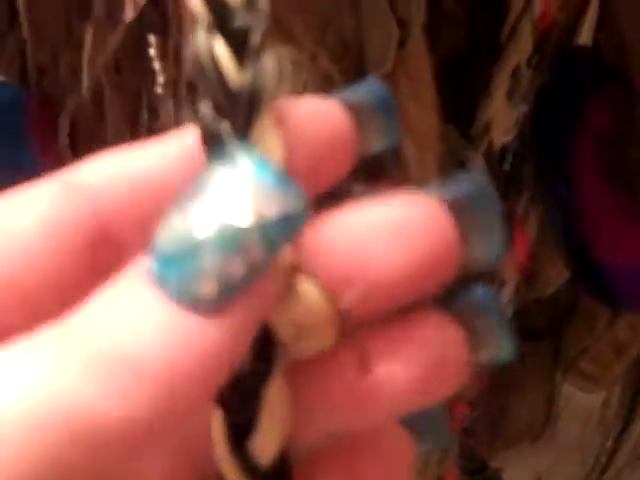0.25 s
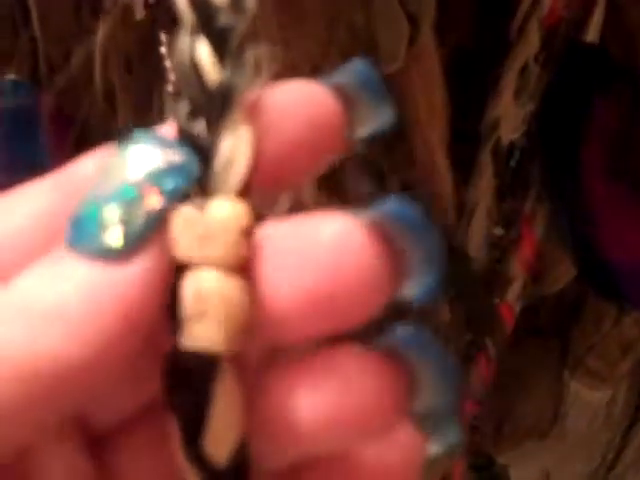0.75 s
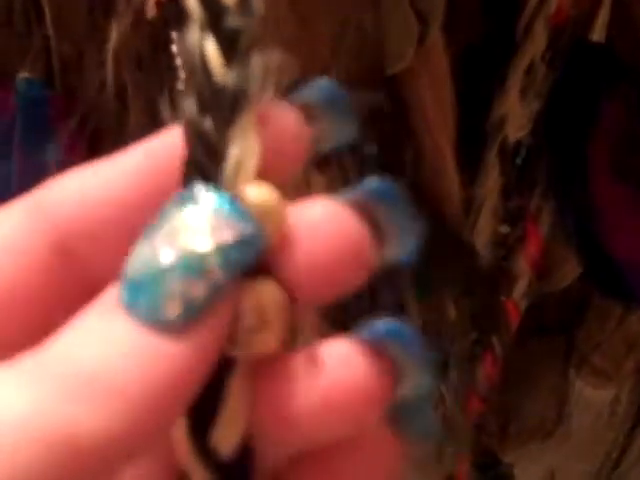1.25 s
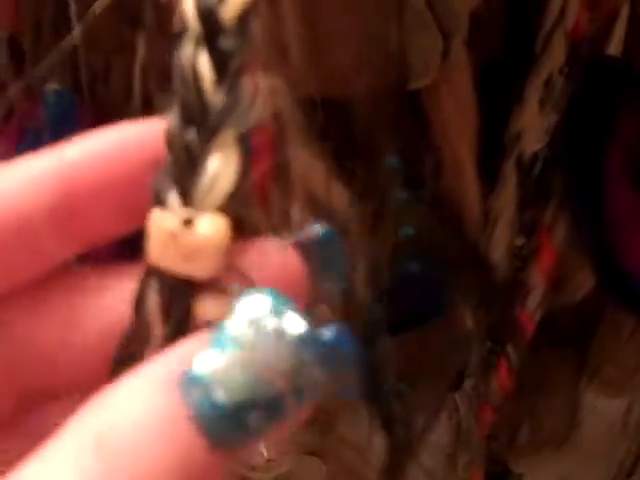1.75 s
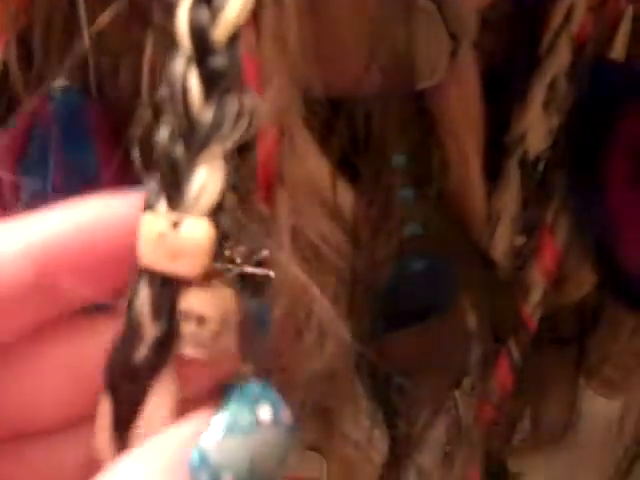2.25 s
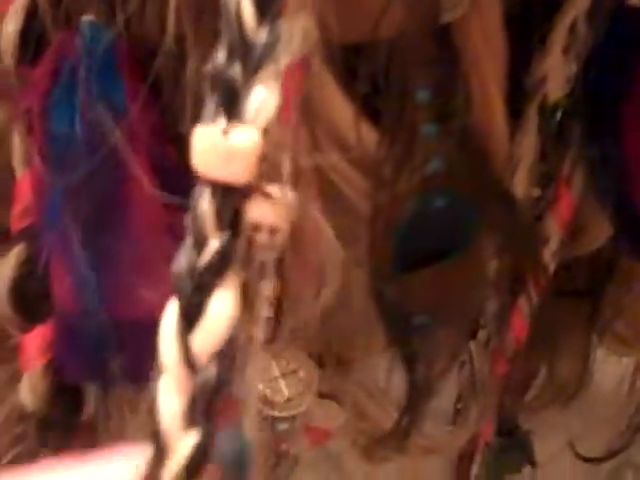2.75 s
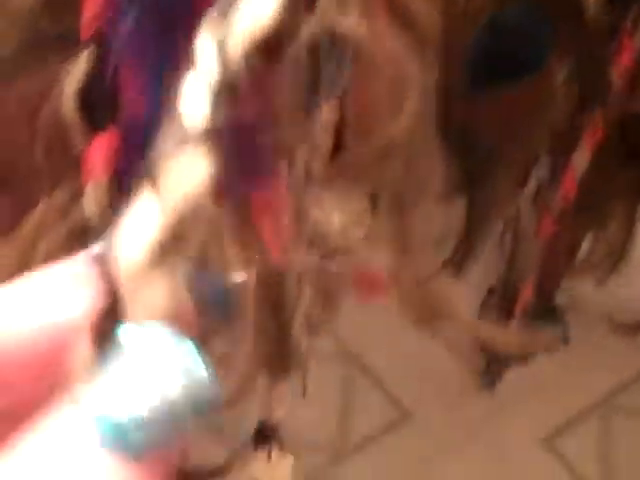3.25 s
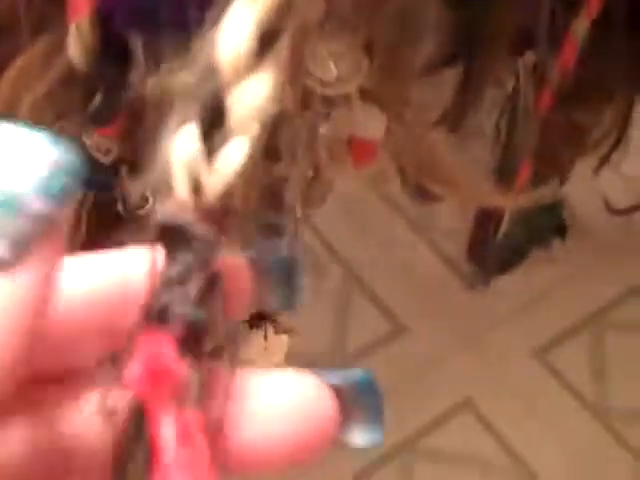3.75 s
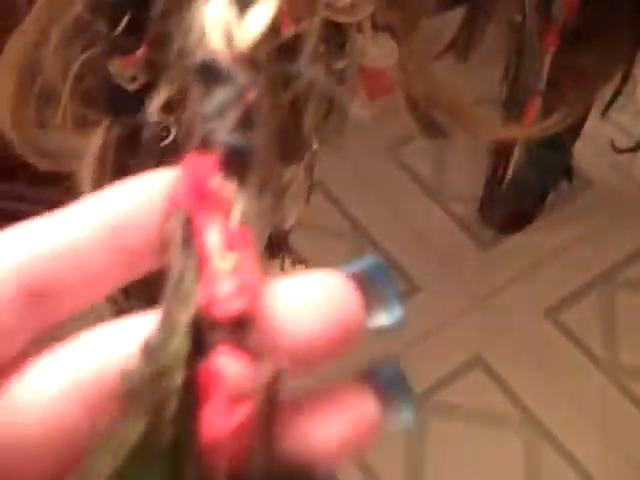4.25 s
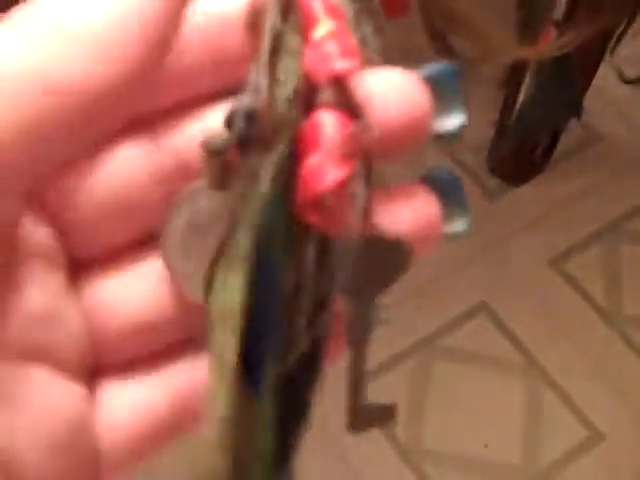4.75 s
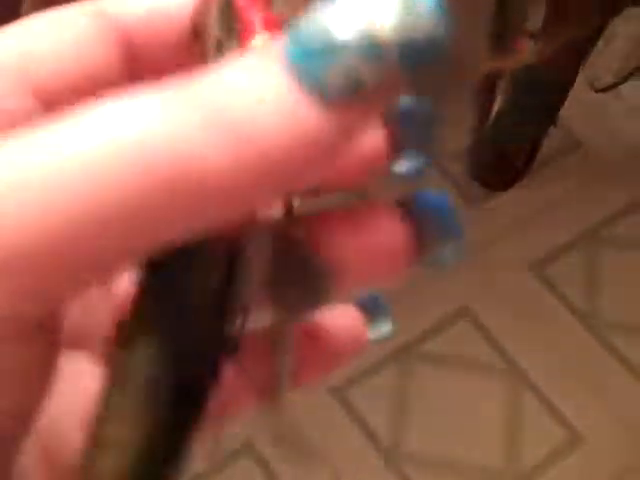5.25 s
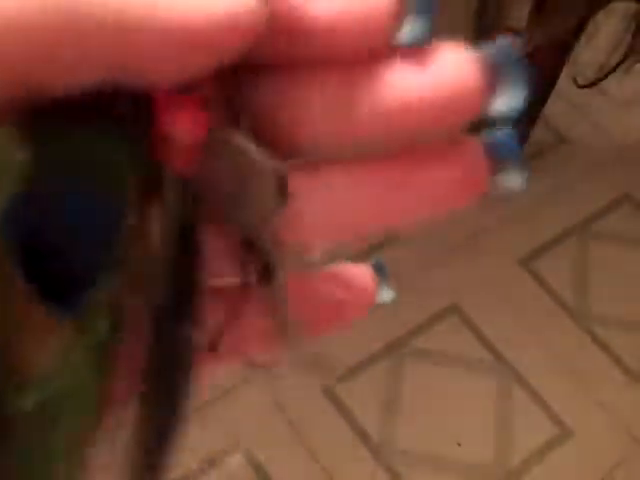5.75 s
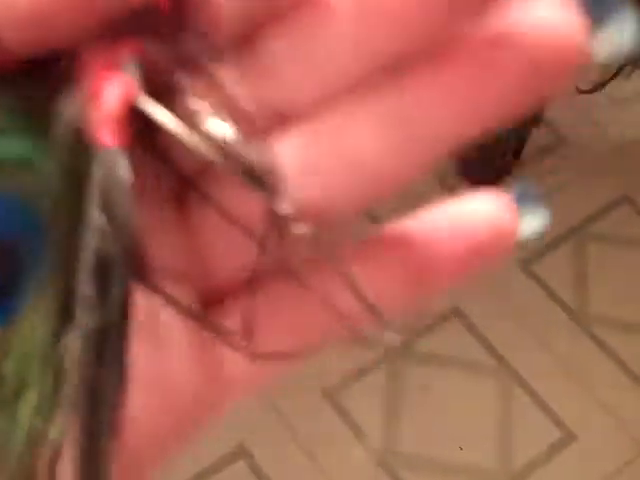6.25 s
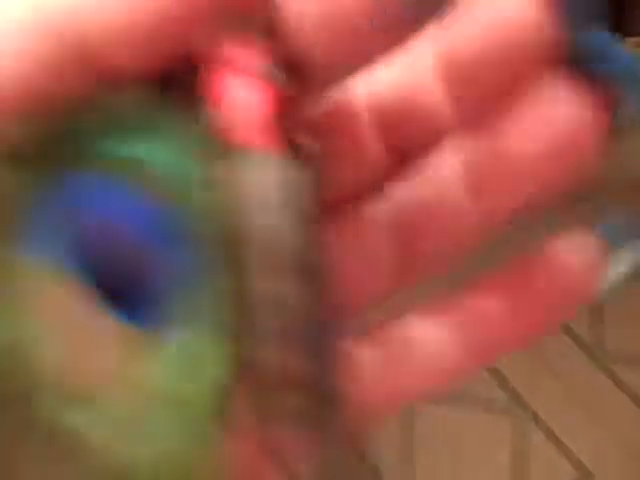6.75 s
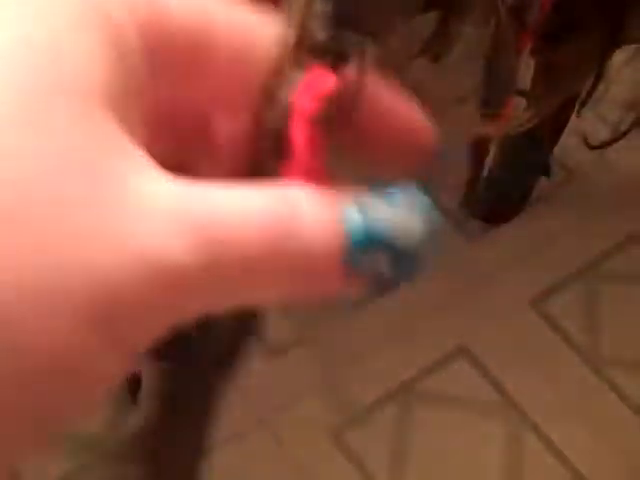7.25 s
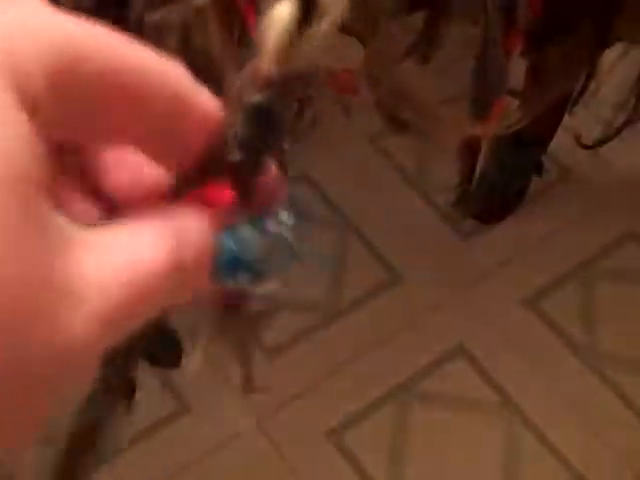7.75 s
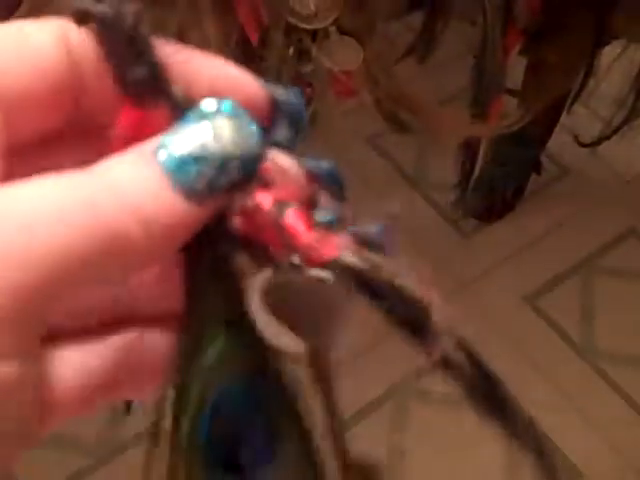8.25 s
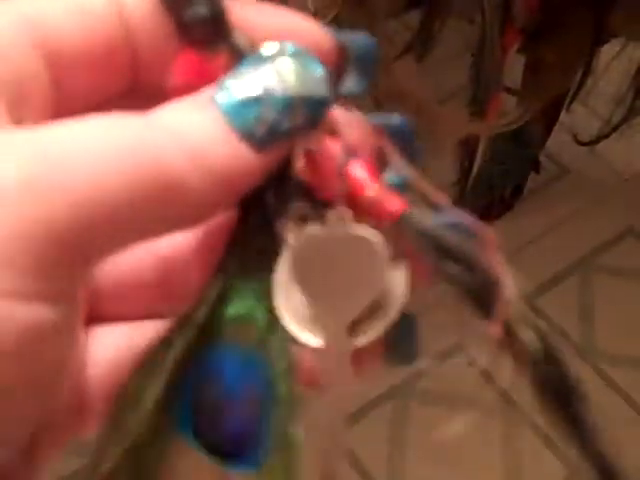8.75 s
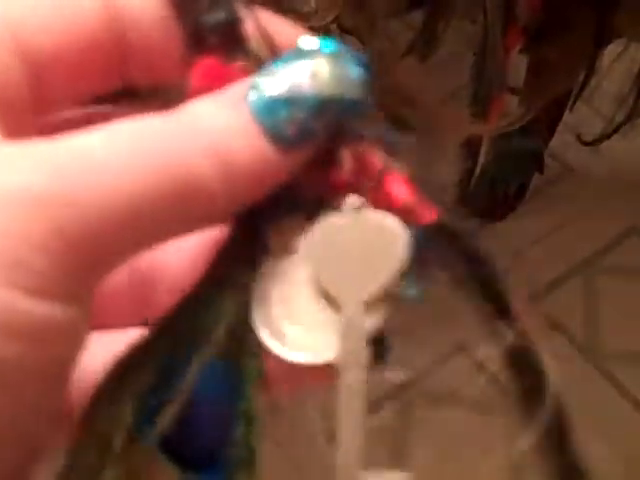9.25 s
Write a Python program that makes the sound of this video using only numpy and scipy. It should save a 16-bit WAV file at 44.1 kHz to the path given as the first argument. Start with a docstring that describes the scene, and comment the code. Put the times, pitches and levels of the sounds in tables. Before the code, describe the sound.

Close handling of beaded hair makes soft rustles, dry clicks and clusters of thin metallic jingling, while a clock ticks faintly in the room.

```python
"""In a quiet room, close to a small camera, a hand sorts through braids hung with beads and charms.
Hair rustles, beads crack dryly, a coin rings when a key hits it, and the two rattle in chains of tiny
contacts as they slide. Further off a clock ticks in its hollow case and something bumps and taps,
over a low hum and a faint whine that fades away."""
import sys
import numpy as np
from scipy import signal
from scipy.fft import rfft, irfft
from scipy.io import wavfile
from scipy.ndimage import uniform_filter1d

SR = 44100
rng = np.random.default_rng(int(sys.argv[2]) if len(sys.argv) > 2 else 0)


def store_pcm(level_fs):
    """Save levels as 16-bit WAV."""
    pcm = np.round(np.clip(level_fs, -1, 1) * 32767).astype(np.int16)
    wavfile.write(sys.argv[1], SR, np.atleast_2d(pcm).T)


N = 418509

# The hand on the braid. Each row: time in seconds, rustle level in dB, pan as left minus right in dB.
HAND_MOVES = [(0, -92, -5), (0.68, -53, -2.5), (1.05, -64, 5), (1.15, -46.5, -5.5), (1.45, -49.5, -3),
              (1.62, -51, -6), (2.2, -58.5, -5), (2.35, -47, -2.5), (3.1, -42.5, -2.5), (3.45, -51.5, -3.5),
              (3.9, -52.5, 3), (4.2, -51.5, -4), (5.1, -68, -4), (5.3, -49, -4.5), (6.1, -54.5, -7),
              (6.45, -46, -2), (6.75, -48.5, -3), (7.05, -50.5, -2.5), (7.5, -43, -2.5), (8.0, -48, -4.5),
              (8.6, -53, 2), (9.1, -49, 2.5), (9.3, -60.5, 2), (9.49, -31.5, 1.5)]
# The key hits the coin. Each row: start in seconds, relative levels of crack, low ring and high ring
# in dB, base ring time (t60) in seconds as the fingers allow.
KEY_STRIKES = [(3.206, -9.5, -20, -14, 0.093), (3.35, -27, -41, -62, 0.058),
               (3.603, -12.5, -37, -17.5, 0.19), (3.6593, -13, -15.5, -19, 0.085),
               (3.683, -14.5, -12, -10, 0.053), (3.6981, -15, -17.5, -24, 0.1),
               (3.715, -24, -22, -17, 0.12), (3.7416, -27, -45, -31, 0.13),
               (3.7548, -23.5, -33, -20.5, 0.08), (3.9142, -20.5, -46, -29, 0.025),
               (4.1263, -26, -44, -23.5, 0.044), (5.2285, -14.5, -50, -36, 0.15),
               (5.239, -27, -36, -25, 0.074), (5.4904, -47, -41, -34, 0.11), (6.47, -2.5, -5.5, -22, 0.023),
               (6.486, -11, -21, -34, 0.05), (6.4907, -4.5, -19, -10, 0.065), (6.53, -20, -34, -27, 0.053),
               (6.551, -16, -51, -25, 0.04), (6.659, -21, -21, -11, 0.058),
               (6.679, -13.5, -12.5, -30, 0.025), (6.715, -32, -32.5, -52, 0.059),
               (6.821, -35, -36, -49, 0.06), (6.8994, -7, -16, -19, 0.09), (6.93, -11, -34, -21, 0.1),
               (6.9354, -9.5, -44, -10, 0.094), (6.954, -25, -36, -18, 0.1),
               (6.9642, -16.5, -40, -21, 0.08), (6.976, -23, -42, -25, 0.1),
               (7.1864, -21.5, -28, -29, 0.074), (7.2554, -14.5, -15, -8.5, 0.12),
               (7.3786, -20, -11.5, -10.5, 0.18), (7.7049, -15, -21, -15.5, 0.13),
               (7.7524, -31, -33.5, -34, 0.095), (8.2761, -12, -39, -11, 0.076),
               (8.394, -10.5, -19, -22, 0.11), (8.402, -6.5, -29, -14.5, 0.059),
               (9.42, -17, -47, -14.5, 0.057)]
# The pitches of the coin's modes in Hz.
COIN_HZ = [4925, 6348, 9453, 11725]
# Their voicing. Each row: relative level in dB, ring time factor, blend from low ring (0) to high (1).
COIN_MODES = [(-23, 1.15, 0.062), (-3, 0.91, 0), (-10.5, 0.35, 1), (6.5, 0.54, 0.94)]
# Key and coin swing loosely together. Each row: start and end in seconds.
LOOSE_SPANS = [(6.44, 7.0), (8.38, 9.1), (9.27, 9.49)]
PINCHED_FROM_S, PINCH_DB = 8.2, -8  # the thumb pinches the charms and damps their lower ring
KEY_SHANK_HZ = 7110


def gain_of(db):
    """Decibels to amplitude."""
    return 10 ** (np.asarray(db) / 20)


def unit_rms(x):
    """Scale to an RMS of 1."""
    return x / np.sqrt(np.mean(x ** 2) + 1e-20)


def curve_at(points, hz):
    """Read a curve of (Hz, value) points along a log frequency axis."""
    point_hz, value = np.transpose(points)
    return np.interp(np.log(hz + 1), np.log(point_hz + 1), value)


def add(mix, start_s, sound):
    """Lay a sound into the mix."""
    part = mix[..., round(start_s * SR):][..., :sound.shape[-1]]
    part += sound[..., :part.shape[-1]]


def colour(x, eq):
    """Minimum-phase EQ through (Hz, dB) points."""
    half = np.log(gain_of(curve_at(eq, np.fft.rfftfreq(4096, 1 / SR))))
    log_gain = signal.hilbert(np.r_[half, half[-2:0:-1]])
    taps = np.fft.ifft(np.exp(np.conj(log_gain))).real[:2048]
    return signal.oaconvolve(x, taps)[:len(x)]


def resonate(x, hz, width_hz, passes=1):
    """Two-pole resonance of gain 1; more passes steepen it."""
    for _ in range(passes):
        x = signal.lfilter(*signal.iirpeak(hz, hz / width_hz, SR), x)
    return x


def ring(hz, t60, phase, size=9000):
    """One struck mode: a dying sine, its phase in turns."""
    t = np.arange(size) / SR
    return np.sqrt(2) * gain_of(-60 * t / t60) * np.sin(2 * np.pi * (hz * t + phase))


def crack(scratch):
    """A hard contact: a spike with a brief scratch behind it."""
    x = scratch * rng.standard_normal(500) * gain_of(-60 * np.arange(500) / SR / 0.011)
    x[0] = 1
    return gain_of(15.5) * x


def pan(db):
    """Stereo gains for a fixed or moving left-minus-right level."""
    return gain_of(np.vstack([db / 2, -db / 2]))


def room_tail(t60):
    """Stereo room reverb: decaying noise whose treble dies sooner."""
    hz, t, spectrum = signal.stft(rng.standard_normal((2, 22050)), SR, nperseg=256)
    band_t60 = t60 / (1 + (hz / 5000) ** 2)[:, None]
    tail = signal.istft(spectrum * gain_of(-60 * t / band_t60), SR, nperseg=256)[1]
    return tail / np.linalg.norm(tail[0])


def room_tone():
    """Steady air, most centred in the low mids, with a wavering motor hum."""
    # The air's colour. Each row: frequency in Hz, relative level in dB.
    air_eq = [(30, -6.5), (134, -8), (242, -3.5), (463, -9), (1370, -19), (2160, -21.5), (4250, -24),
              (6380, -22), (10000, -29.5), (14100, -32), (14500, -68)]
    # Its stereo image. Each row: frequency in Hz, left-right correlation.
    air_correlation = [(40, -0.12), (240, 0.77), (950, 0.56), (3770, -0.051), (15000, -0.015)]
    # Motor orders. Each row: pitch in Hz, level in dB.
    hum_orders = [(233, -62), (350, -72.5), (465, -69)]
    hz = np.fft.rfftfreq(N, 1 / SR)
    left, spread = rfft(rng.standard_normal((2, N)))
    alike = curve_at(air_correlation, hz)
    right = alike * left + np.sqrt(1 - alike ** 2) * spread
    air = irfft(np.array([left, right]) * gain_of(curve_at(air_eq, hz)), N)
    noise = rng.standard_normal(N)
    hum = sum(gain_of(db) * unit_rms(resonate(noise, pitch, 3.3)) for pitch, db in hum_orders)
    return gain_of(-54) * unit_rms(air) * pan(1.0) + hum


def whine(hz=5499, width_hz=5, db=-75, gone_s=7, fade_s=2):
    """A thin tone of narrow noise that fades out."""
    fade = np.clip((gone_s - np.arange(N) / SR) / fade_s, 0, 1)
    return gain_of(db) * fade * unit_rms(resonate(rng.standard_normal((2, N)), hz, width_hz))


def far_bumps():
    """Dull knocks so far off that only their room tail arrives."""
    # Each row: start in seconds, level in dB, reverb time (t60) in seconds.
    knocks = [(2.347, -42.5, 1), (2.595, -53.5, 0.9), (2.8, -57, 0.69)]
    # Their dull colour. Each row: frequency in Hz, relative level in dB.
    knock_eq = [(59, -54), (100, -2), (190, -6.5), (349, -2), (484, -0.5), (904, -7.5), (1960, -11),
                (3500, -40), (4550, -67)]
    out = np.zeros((2, N))
    for start, db, t60 in knocks:
        tail = np.array([colour(side, knock_eq) for side in room_tail(t60)])
        tail = tail + 0.56 * tail[::-1]  # crossfeed narrows the image
        onset_rms = np.sqrt(np.mean(tail[:, :2000] ** 2))
        add(out, start, gain_of(db) * tail / onset_rms)
    return out


def far_taps(first_s=.804, every_s=1.8):
    """Small, evenly spaced knocks with one woody resonance."""
    out = np.zeros((2, N))
    for start in np.arange(first_s, N / SR, every_s):
        add(out, start, gain_of(-11.5) * resonate(room_tail(0.26), 1810, 400, passes=2))
    return out


def clock(first_s=.2729, swing_s=1.11, tock_after_s=.5758, fade_db_per_s=0.22):
    """Tick and tock: snaps in a hollow case, heard mostly through the room."""
    # Case modes. Each row: pitch in Hz, nominal width in Hz, relative dB on the tick and on the tock.
    case_modes = [(1090, 270, -3.5, -3.5), (1715, 230, -1.5, -5.5), (2104, 400, 1.5, 1.5),
                  (2340, 65, 4.5, -2.5), (3710, 460, -2.5, -4.5), (5550, 270, -11.5, -11)]
    out = np.zeros((2, N))
    swings = np.arange(0, N / SR - first_s, swing_s)
    ticks = swings + .00013 * swings ** 2  # the tick slips gradually later
    tocks = swings + tock_after_s
    for beat, (db, times) in enumerate([(-5, ticks), (-3, tocks)]):
        for start in first_s + times:
            snap = room_tail(0.34)
            snap[:, :200] += 0.045 * rng.standard_normal(200) * np.hanning(200)  # direct sound
            body = sum(gain_of(beat_db[beat]) * resonate(snap, hz, 1.57 * width, passes=2)
                       for hz, width, *beat_db in case_modes)
            level = gain_of(db - fade_db_per_s * start)  # fainter as the camera turns away
            add(out, start - .002, level * (body + 0.23 * body[::-1]))
    return out


def hand_motion():
    """The hand's rustle level and pan in dB, sample by sample."""
    times, level_db, pan_db = np.transpose(HAND_MOVES)
    t = np.arange(N) / SR
    return np.interp(t, times, level_db), np.interp(t, times, pan_db)


def hair_rustle(hand_db):
    """Fine friction of hair and yarn: hiss with countless tiny snags."""
    centre, sides = rng.standard_normal(N), rng.standard_normal((2, N))
    snags = gain_of(3.8 * np.minimum(rng.exponential(1, N), 6))
    flutter = gain_of(2.5 * unit_rms(uniform_filter1d(rng.standard_normal(N), 1200)))
    return gain_of(hand_db) * unit_rms((centre + .5 * sides) * snags * flutter)


def charm_chatter(hand_db, from_s=2.95, hits_per_s=60, timbres=6):
    """Tiny chance contacts, as loud as the hand is lively; they set the loose coin shimmering."""
    t = np.arange(N) / SR
    size, chance, timbre = rng.random((3, N))
    strength = gain_of(hand_db + 2 - 1.5 * np.log(size + 0.042))
    hits = strength * (chance < hits_per_s / SR) * (t > from_s)
    clicks = sum(signal.oaconvolve(hits * (np.floor(timbre * timbres) == k), crack(0.33))[:N]
                 for k in range(timbres))
    loose = sum((t > start) & (t < end) for start, end in LOOSE_SPANS)
    pinch_db = PINCH_DB * (t > PINCHED_FROM_S)
    shimmer = np.zeros(N)
    for hz, (mode_db, _, high) in zip(COIN_HZ, COIN_MODES):
        level = gain_of(0.71 * mode_db + 1.7 * high + pinch_db * (1 - high))
        shimmer += level * resonate(loose * clicks, hz, 0.0055 * hz)
    return clicks + gain_of(20.5) * shimmer


def sliding_contacts(start, length_s, hits_per_s=7000):
    """One slide's dense, clumpy stereo contacts, and a pitch in Hz that colours it."""
    polarity, size, chance, wander = rng.random((4, 5000))[:, :round(length_s * SR)]
    hits = np.sign(polarity - .5) * gain_of(-3 * np.log(size + .01)) * (chance < hits_per_s / SR)
    struck = min(abs(start - row[0]) for row in KEY_STRIKES) < .004  # a blow starts it at full strength
    arch = np.sin(np.pi * np.linspace(.5 * struck, 1, len(hits))).clip(0)
    swell = arch ** (1.6 if struck else 0.5)
    clumps = gain_of(2.5 * unit_rms(uniform_filter1d(wander - .5, 120)))
    hits = unit_rms(hits) * swell * clumps * pan(12 * (wander - .5))
    return np.pad(hits, ((0, 0), (0, 2000))), 6000 + 2500 * polarity[0]


def charm_rattles():
    """Key and coin slide over each other; the contacts scrape and shake the damped metal."""
    # Each row: start and length in seconds, level in dB, relative level of the ring in dB.
    slides = [(3.863, 0.027, -40, 0), (3.91, 0.022, -26.5, 5.5), (3.999, 0.016, -41, 0),
              (5.26, 0.039, -37, 9.5), (5.382, 0.087, -38, -1), (5.49, 0.045, -50, 26),
              (5.669, 0.027, -38.5, 1), (5.697, 0.08, -45, -17), (6.473, 0.015, -21.5, -6),
              (6.489, 0.03, -21, -3), (6.567, 0.034, -36.5, -2), (6.617, 0.079, -28, 5),
              (6.796, 0.041, -40, -8), (6.843, 0.049, -31, 2), (6.941, 0.051, -35, 1),
              (8.279, 0.062, -26, 6), (8.403, 0.032, -22, -11), (8.436, 0.0099, -21.5, 6),
              (8.456, 0.054, -33, 3), (8.5656, 0.0062, -31, 9), (8.59, 0.039, -35, 14),
              (8.642, 0.019, -41.5, 11), (8.731, 0.043, -50, 9), (8.885, 0.064, -39, -5),
              (8.916, 0.016, -30.5, 8), (8.979, 0.011, -30.5, -4), (9.275, 0.062, -35, 5),
              (9.418, 0.047, -33.5, 10), (9.455, 0.079, -45, 1)]
    # The loose key drags over the coin. Each row: pitch in Hz, width in Hz, gain in dB.
    scrape_bands = [(4960, 60, 15), (4040, 640, -0.5)]
    thin = signal.butter(4, 5500, "high", fs=SR, output="sos")
    top_cut = signal.butter(8, 12900, fs=SR, output="sos")  # a steep low-pass trims the rattles' treble
    out = np.zeros((2, N))
    for start, length_s, db, ring_db in slides:
        hits, colour_hz = sliding_contacts(start, length_s)
        pinch_db = PINCH_DB * (start > PINCHED_FROM_S)
        metal = gain_of(-9) * resonate(hits, KEY_SHANK_HZ, 360)
        for hz, (mode_db, _, high) in zip(COIN_HZ, COIN_MODES):
            level = gain_of(0.9 * mode_db + 9.5 * high + pinch_db * (1 - high))
            metal += level * resonate(hits, hz, 0.021 * hz)
        scrape = hits + 1.5 * resonate(hits, colour_hz, 700)
        if any(begin < start < end for begin, end in LOOSE_SPANS):
            scrape += sum(gain_of(band_db + pinch_db) * resonate(scrape, hz, width)
                          for hz, width, band_db in scrape_bands)
        else:
            scrape = signal.sosfilt(thin, scrape)  # gripped charms slide thinly
        add(out, start, gain_of(db) * (scrape + gain_of(ring_db) * metal))
    return signal.sosfilt(top_cut, out)


def dry_clicks():
    """Short dry clicks of beads and charms, some with more hollow body."""
    # Each row: start in seconds, crack level in dB, body above the crack in dB (capped at 15).
    clicks = [(0.336, -24, -26), (0.744, -41.5, 15), (0.7531, -19, -7.5), (1.212, -45, 16),
              (1.494, -20, -30), (1.5968, -17, 5), (1.678, -41.5, 26), (3.0575, -31.5, 4), (3.7235, -23, 4),
              (3.7751, -27, -4), (3.839, -21, -20), (5.286, -24, 1), (5.931, -28, -5), (6.2424, -32.5, 2.5),
              (6.642, -16, -10), (6.647, -14, -15), (6.908, -22, 1), (6.918, -23, -2), (6.971, -32, -15),
              (7.3966, -17, -10), (7.4204, -25.5, 4), (7.948, -27.5, -3), (8.514, -32, -8),
              (8.523, -30, -10), (8.6864, -31, -15), (8.6947, -25, -15), (8.722, -26.5, -6),
              (8.9826, -21.5, 1), (9.028, -35, 2), (9.0604, -30.5, 3.5), (9.157, -30, -17),
              (9.3494, -28.5, -2), (9.3878, -23.5, -4)]
    lows = signal.butter(3, 4800, fs=SR, output="sos")
    out = np.zeros(N)
    for start, db, body_db in clicks:
        snap = crack(0.21)
        body = signal.sosfiltfilt(lows, snap)
        add(out, start, gain_of(db) * (snap - body + gain_of(min(body_db, 15)) * body))
    return out


def small_charm(dull):
    """A smaller charm, too light to knock: a thin crack and a high ring."""
    # Each row: start in seconds, level in dB.
    blows = [(2.9744, -25), (3.304, -30.5), (3.317, -28)]
    # Each row: pitch in Hz, level relative to the blow in dB, ring time (t60) in seconds.
    charm_modes = [(12870, 6.5, 0.1), (10530, -4.5, 0.11)]
    out = np.zeros(N)
    for start, db in blows:
        snap = crack(0.38)
        add(out, start, gain_of(db) * (snap - signal.sosfiltfilt(dull, snap)))
        for hz, mode_db, t60 in charm_modes:
            add(out, start, gain_of(db + mode_db) * ring(hz, t60, rng.random()))
    return out


def key_strikes(dull, held_from_s):
    """Each blow cracks, knocks and briefly rings the key; once held, the hand soaks up the lows."""
    out = np.zeros(N)
    grips = rng.standard_normal((len(KEY_STRIKES), 3))
    for (start, db, low_db, _, _), (accent, bend, phase) in zip(KEY_STRIKES, grips):
        held = start > held_from_s
        snap = crack(0.19)
        add(out, start, gain_of(db) * (snap - held * 0.64 * signal.sosfiltfilt(dull, snap)))
        knock = signal.sosfilt(dull, crack(0.17))
        add(out, start, gain_of(low_db + (-3 if held else 9.5)) * knock)
        shank = ring(KEY_SHANK_HZ * (1 + 0.0054 * bend), t60=0.024, phase=phase)
        add(out, start, gain_of(db - 11.5 + 2.1 * accent) * shank)
    return out


def coin_ring(held_from_s, muted_below_hz=5500):
    """Each blow stops the coin and rings it anew; strike spot and grip vary level, pitch and phase."""
    starts, _, low_db, high_db, t60 = np.transpose(KEY_STRIKES)
    out, t = np.zeros(N), np.arange(N) / SR
    last = np.maximum(np.searchsorted(starts, t) - 1, 0)  # the latest blow at each sample
    age_s = np.where(t > starts[0], t - starts[last], 9)  # silent before the first
    spots = rng.standard_normal((len(starts), len(COIN_MODES), 3)).transpose(1, 2, 0)
    for hz, (mode_db, t60_factor, high), (accent, bend, phase) in zip(COIN_HZ, COIN_MODES, spots):
        start_db = low_db + high * (high_db - low_db) + mode_db * (1 + 0.017 * accent)
        if hz < muted_below_hz:
            start_db += np.where(starts > held_from_s, -2.5, 9)  # muted in the hand, full when free
        envelope = gain_of(start_db[last] - 60 * age_s / (t60_factor * t60[last]))
        envelope = signal.lfilter([.03], [1, .03 - 1], envelope)  # attack of about a millisecond
        buzz = unit_rms(resonate(rng.standard_normal(N), hz, 410, passes=2))
        roughness = .2 * (hz / 10000) ** 2  # loose contact buzzes, more so up high
        turns = hz * (1 + .001 * bend[last]) * age_s + phase[last]
        out += envelope * (np.sqrt(2) * np.sin(2 * np.pi * turns) + roughness * buzz)
    return out


def coin_deep_ring(hz=3445):
    """Few blows wake the coin's deepest mode, but it lingers through later ones."""
    # Each row: start in seconds, level in dB, ring time (t60) in seconds.
    blows = [(3.603, -40, 0.4), (3.683, -36, 0.53), (7.38, -36, 0.15)]
    out = np.zeros(N)
    for start, db, t60 in blows:
        add(out, start, gain_of(db) * ring(hz, t60, rng.random(), size=16000))
    return out


def clinks(held_from_s=3.8):
    """Metal on metal; the coin hangs free at first, then lies in the hand."""
    dull = signal.butter(3, 3500, fs=SR, output="sos")  # the knocking low end of a crack
    return key_strikes(dull, held_from_s) + coin_ring(held_from_s) + coin_deep_ring() + small_charm(dull)


def scene():
    """The close sounds pan with the hand and echo lightly, in front of the room's own sounds."""
    # Two microphone openings colour the close sounds. Each row: frequency in Hz, left dB, right dB.
    port_eq = [(304, -61, -71), (1890, -22, -25.5), (3120, -18, -19.5), (5160, -10.5, -12),
               (6110, -10.5, -0.5), (6630, -7.5, 1), (7580, 5, -11), (8950, -1.5, -19.5), (9380, -6, -19),
               (12200, -15, -29.5), (14200, -24, -44), (17100, -61, -31)]
    hand_db, pan_db = hand_motion()
    near = clinks() + dry_clicks() + charm_chatter(hand_db) + charm_rattles() + hair_rustle(hand_db)
    near *= pan(pan_db)
    near += gain_of(-20) * signal.fftconvolve(near, room_tail(.4), axes=1)[:, :N]
    # early reflections off the palm and the camera body
    echoes = rng.standard_normal((2, 900)) * gain_of(-60 * np.arange(900) / SR / 0.032)
    echoes /= np.linalg.norm(echoes[0])
    near += gain_of(-11) * signal.oaconvolve(near, echoes, axes=1)[:, :N]
    left = colour(near[0], [(hz, db) for hz, db, _ in port_eq])
    right = colour(near[1], [(hz, db) for hz, _, db in port_eq])
    return np.array([left, right]) + clock() + far_bumps() + far_taps() + room_tone() + whine()


def record(dry, cutoff_hz=16400):
    """A steep low-pass trims the very top."""
    lowpass = signal.firwin(511, cutoff_hz, window=("kaiser", 9), fs=SR)
    return signal.oaconvolve(dry, lowpass[None], "same")


dry = scene()
out = record(dry)
store_pcm(out)
```